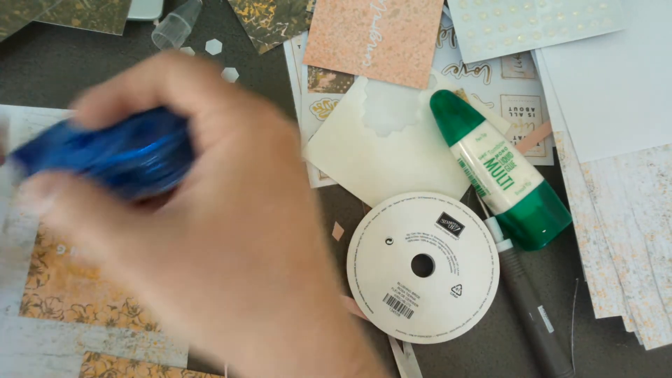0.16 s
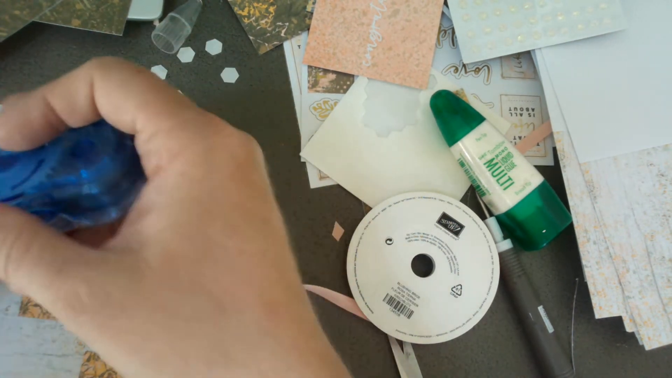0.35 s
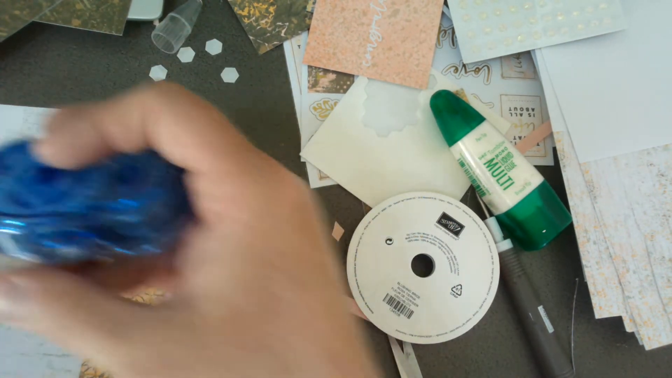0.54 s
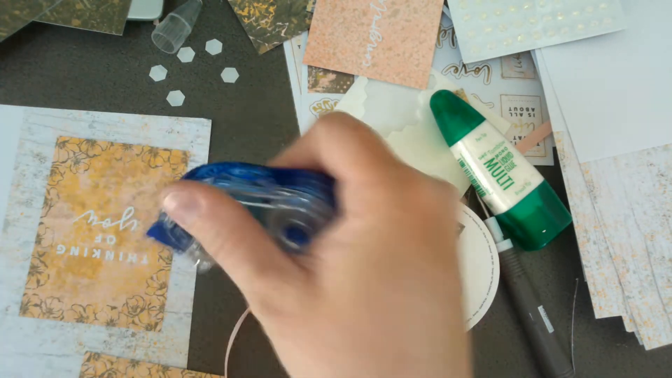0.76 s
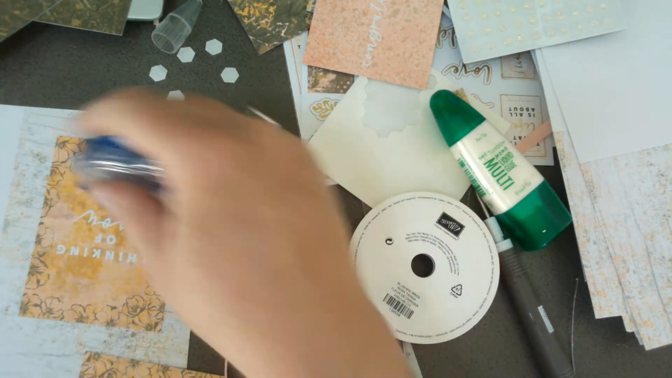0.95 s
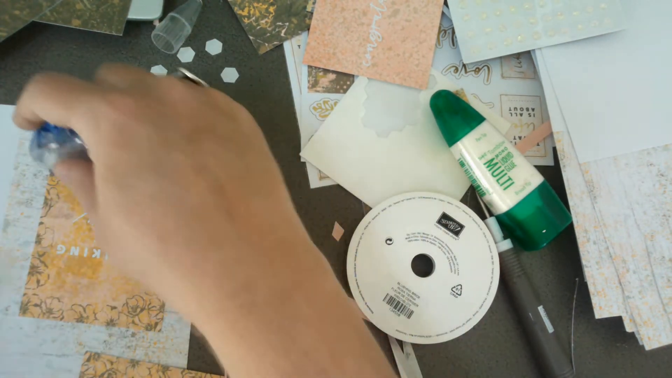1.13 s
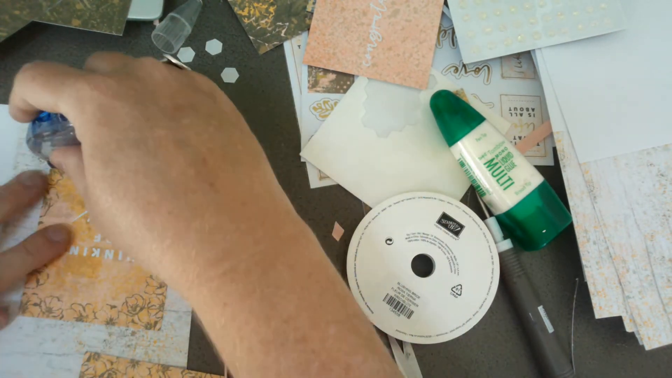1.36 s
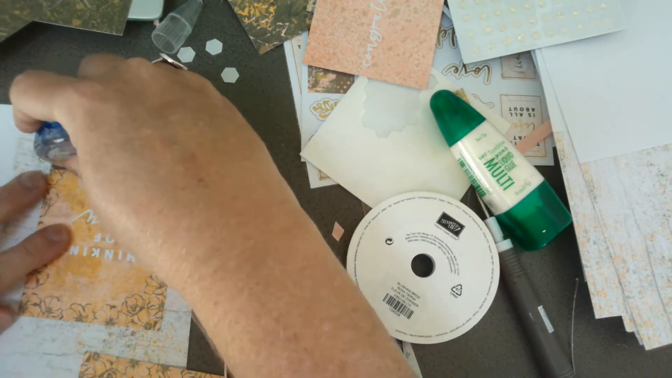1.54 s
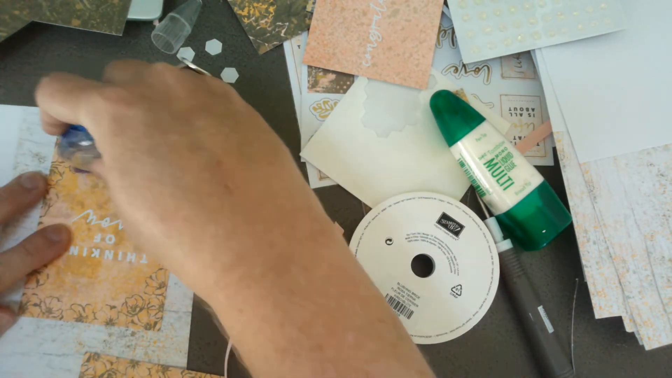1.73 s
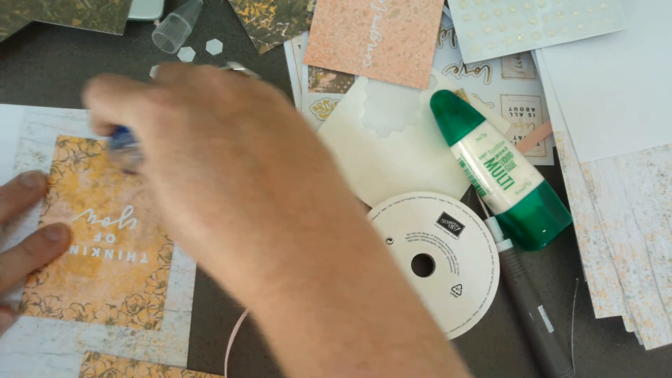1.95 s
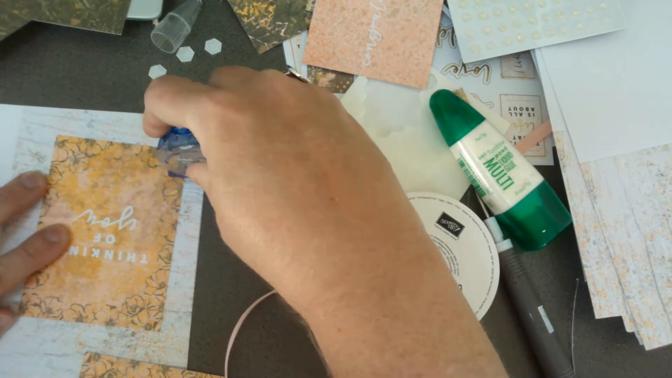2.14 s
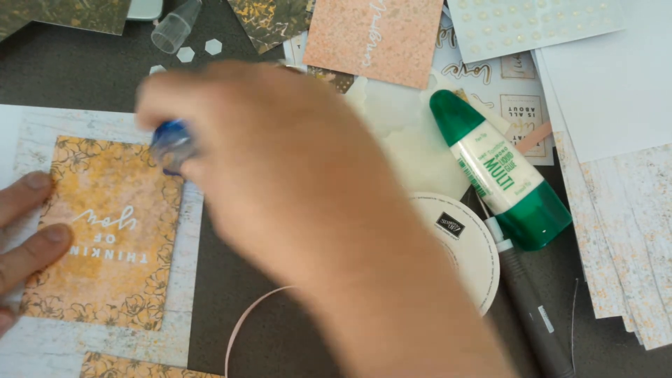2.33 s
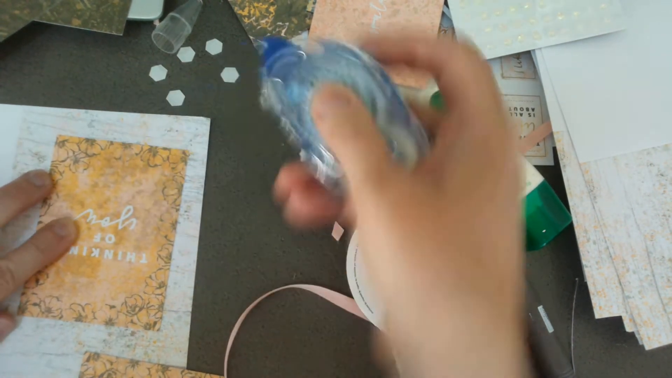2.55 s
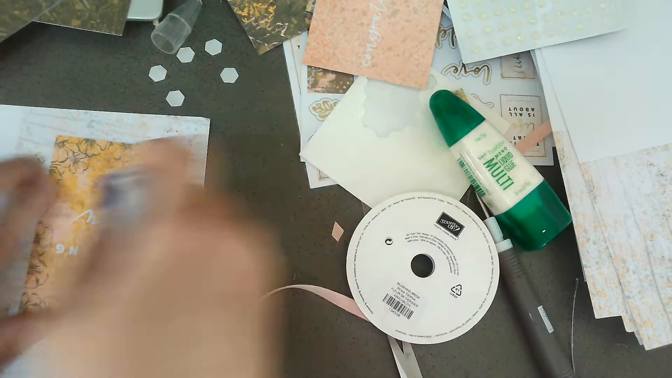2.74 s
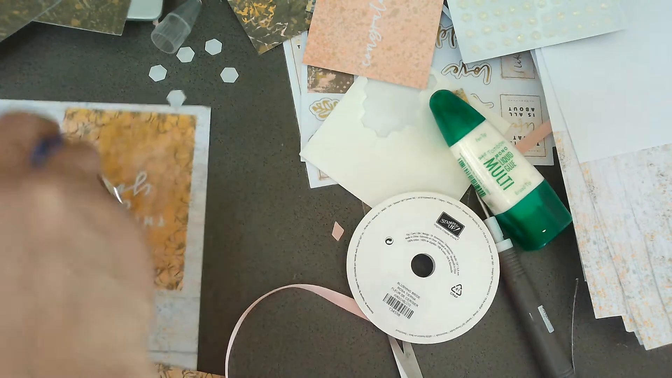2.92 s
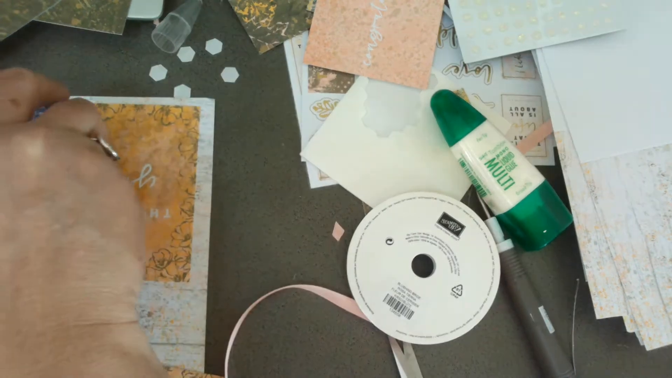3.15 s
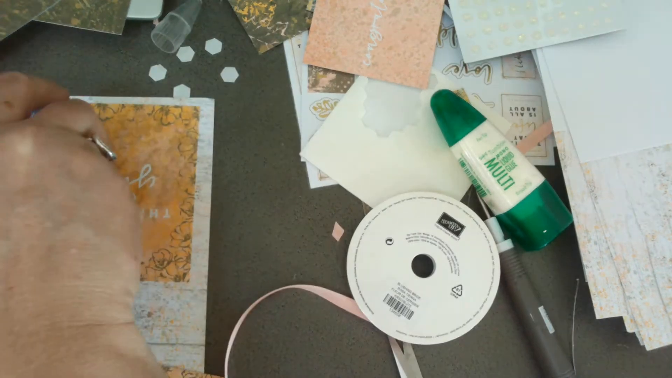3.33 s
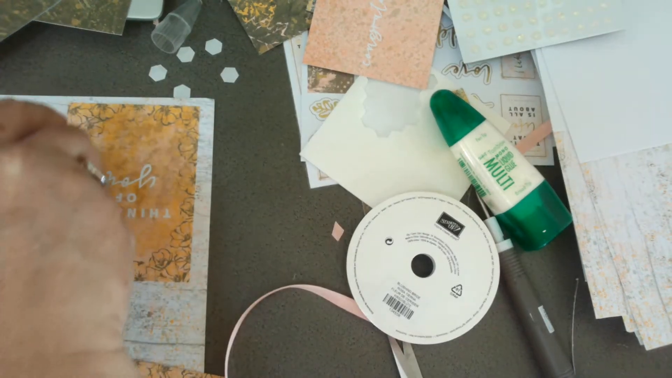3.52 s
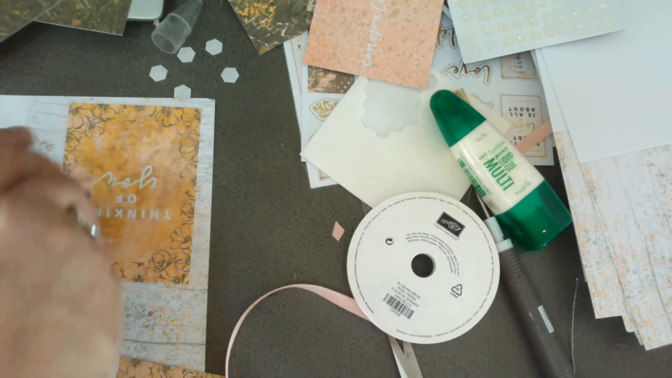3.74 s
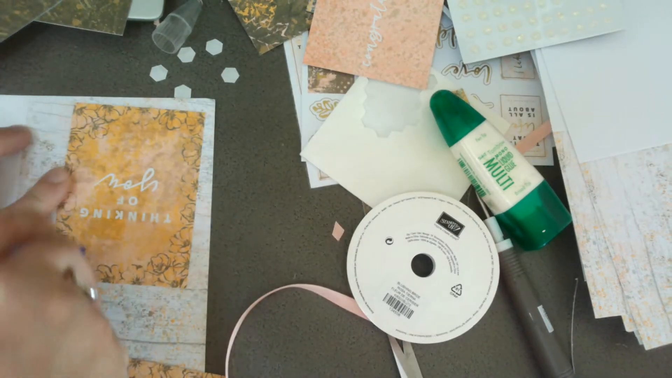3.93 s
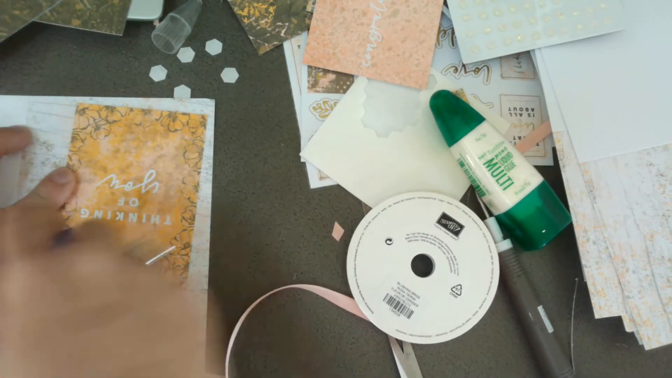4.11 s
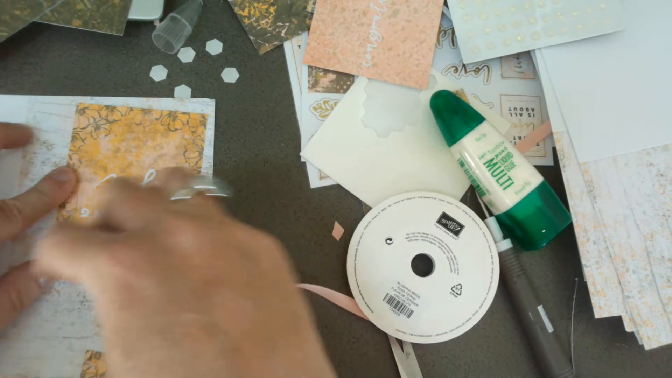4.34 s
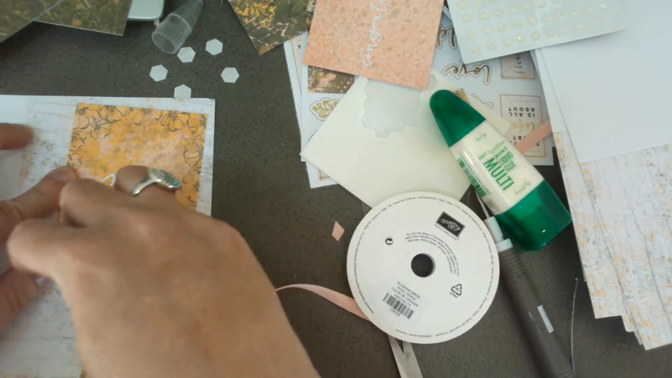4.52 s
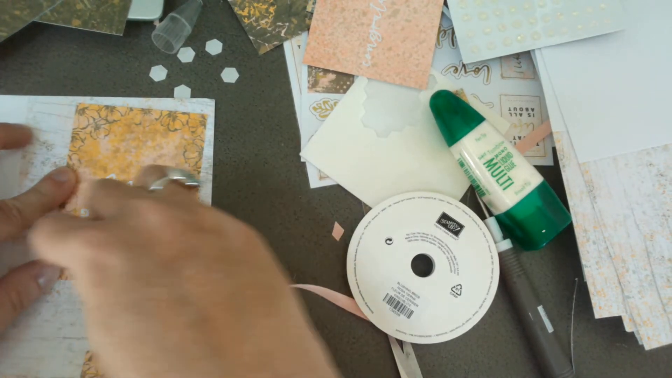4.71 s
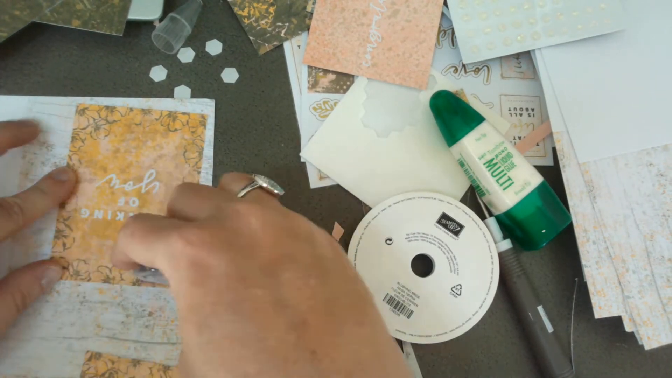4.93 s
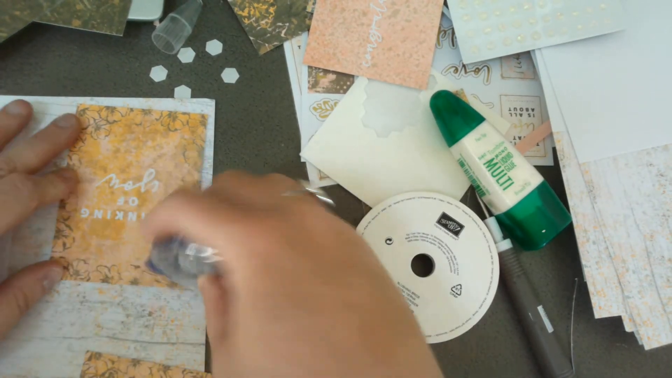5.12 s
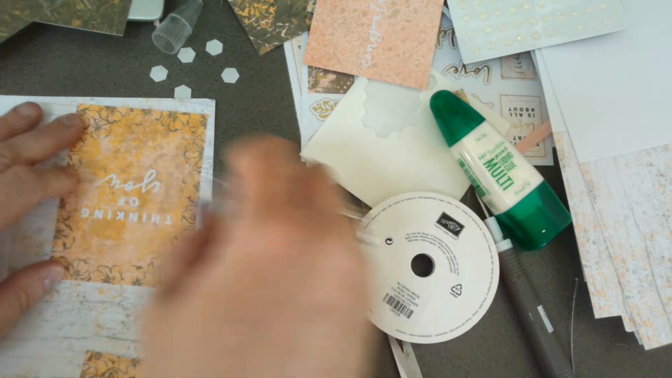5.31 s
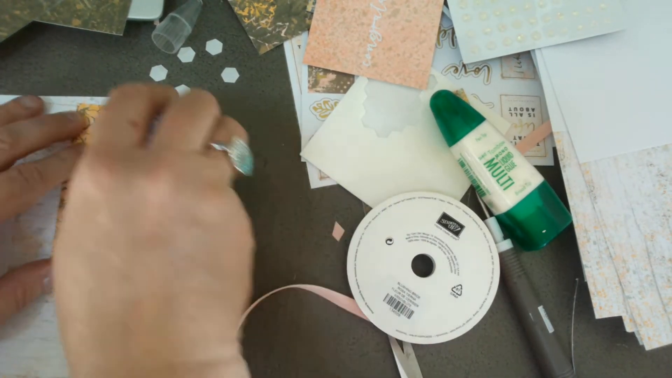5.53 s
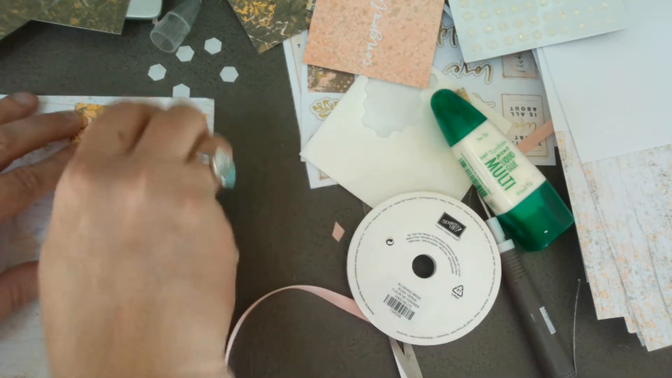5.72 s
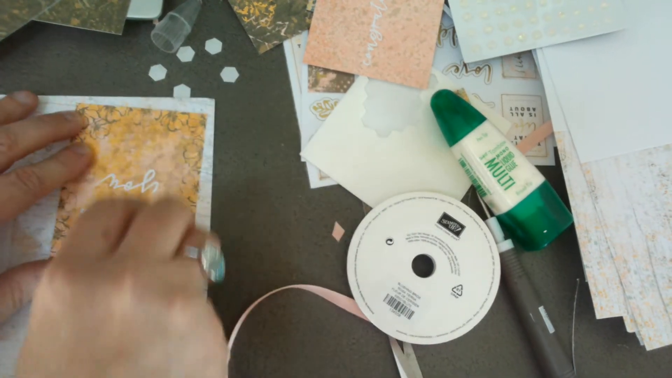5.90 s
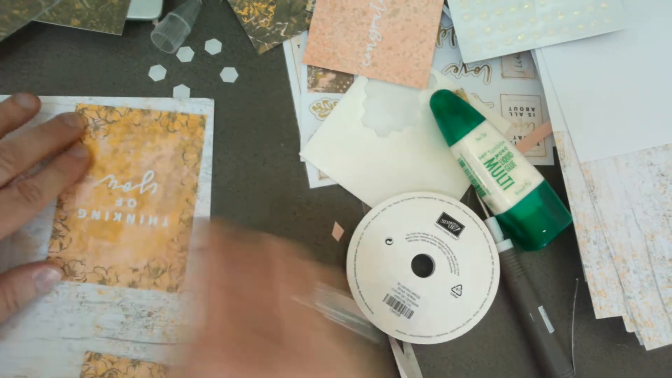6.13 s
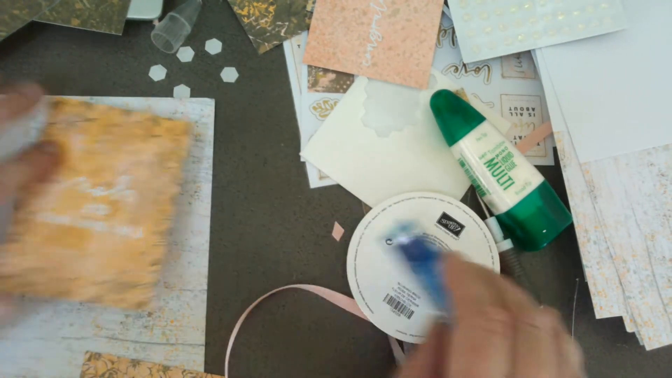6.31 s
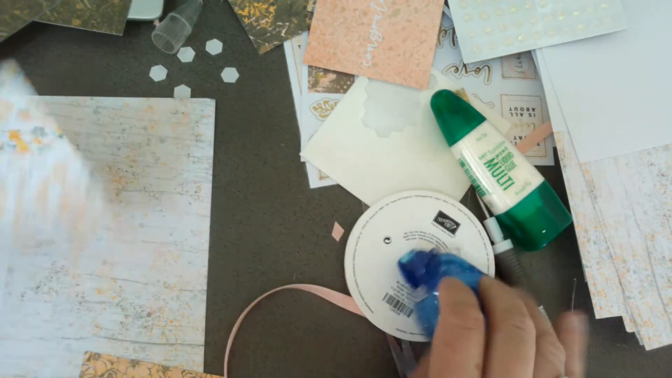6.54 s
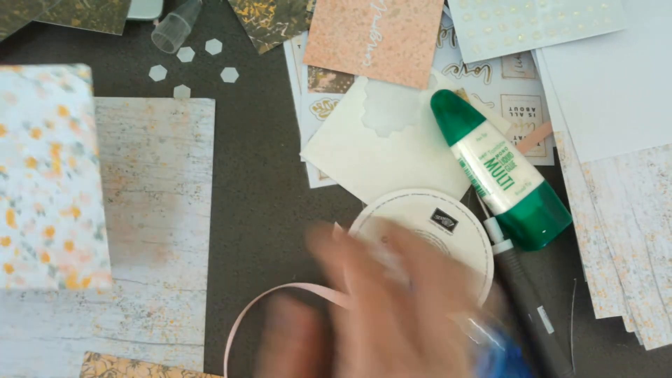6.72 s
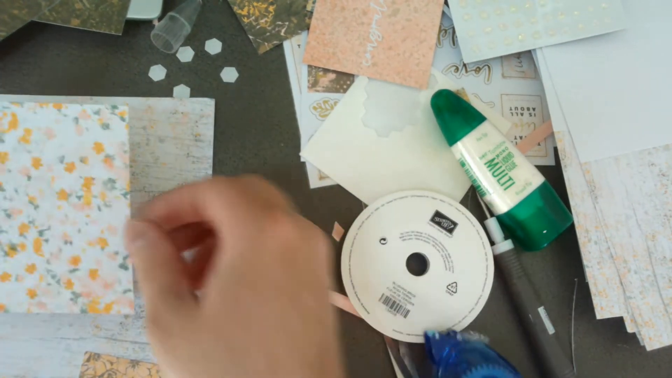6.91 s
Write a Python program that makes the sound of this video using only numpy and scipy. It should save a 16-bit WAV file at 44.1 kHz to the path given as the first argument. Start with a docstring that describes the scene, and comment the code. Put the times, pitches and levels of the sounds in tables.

```python
"""Tape runner on cardstock

A plastic tape runner is drawn along four card edges: a ratchet snaps per tooth as shaped noise,
at an uneven pace, over the hiss of unrolling tape. Filtered noise hits click the case and bump the table.
At the end it is dropped beside a hollow spool, which rings as decaying sines, while card slides about.
A small, quiet room answers with a noise tail, under rumble, faint hiss and a weak hum."""
import sys
import numpy as np
from scipy import signal
from scipy.fft import rfft, irfft, next_fast_len
from scipy.io import wavfile
from scipy.ndimage import uniform_filter1d

SR = 44100
rng = np.random.default_rng(int(sys.argv[2]) if len(sys.argv) > 2 else 0)


def wav_out(sig):
    """Save sig, one row per channel (or a flat mono array), as 16-bit PCM at SR to the path in sys.argv[1]."""
    wavfile.write(sys.argv[1], SR, np.round(np.clip(np.atleast_2d(sig).T, -1, 1) * 32767).astype(np.int16))


N = 307155
HIT_S = np.arange(SR // 8) / SR  # time axis of one hit


def amp(db):
    """Decibels to gain."""
    return 10 ** (np.asarray(db) / 20)


def unit(x):
    """Scales to rms 1."""
    return x / np.sqrt(np.mean(x ** 2) + 1e-20)


def along(points, hz):
    """Reads (Hz, value) points on a log frequency axis."""
    f, v = np.transpose(points)
    return np.interp(np.log(hz + 1), np.log(f), v)


def add(track, start_s, sound):
    """Mixes a sound into the track in place, cut at the track's end."""
    part = track[max(round(start_s * SR), 0):][:len(sound)]
    part += sound[:len(part)]


def coloured(x, db_of_hz):
    """Filters x by a dB curve, minimum-phase so that nothing sounds before the hit."""
    m = 2 * next_fast_len(len(x))
    log_gain = np.log(amp(db_of_hz(np.fft.rfftfreq(m, 1 / SR))) + 1e-6)
    # folding the cepstrum makes the filter causal
    cepstrum = irfft(log_gain)
    cepstrum[1:m // 2] *= 2
    cepstrum[m // 2 + 1:] = 0
    return irfft(rfft(x, m) * np.exp(rfft(cepstrum)))[:len(x)]


def dying(noise, t60s, hold_s=0):
    """Noise that holds for a moment, then decays at its own rate in each band."""
    t = np.maximum(np.arange(len(noise)) / SR - hold_s, 0)
    hz = np.fft.rfftfreq(len(noise), 1 / SR)
    centres_hz, times_s = np.transpose(t60s)
    shares = np.array([along(np.c_[centres_hz, row], hz) for row in np.eye(len(centres_hz))])
    bands = irfft(rfft(noise) * shares, len(noise))
    return np.sum(bands * amp(-60 * t / times_s[:, None]), axis=0)


def strike(x, db):
    """Scales a hit so that its energy, packed into one millisecond, has this level."""
    return amp(db) * x / np.sqrt(np.sum(x ** 2) * 1000 / SR)


USUAL_TEETH_PER_S = 57


def teeth(travel):
    """One snap per tooth passed: time in s, level in dB, speed in octaves above the usual one."""
    s, passed, db = np.transpose(travel)
    tooth = np.arange(round(passed[-1]) + 1)
    times_s = np.interp(tooth, passed, s)
    speed_octaves = -np.log2(np.abs(np.gradient(times_s)) * USUAL_TEETH_PER_S + 1e-6)
    return times_s, np.interp(times_s, s, db), speed_octaves


def grip_db(grip, progress, hz):
    """Flat-topped resonances and dips of the grip, gliding as progress goes from 0 to 1."""
    total_db = 0
    for start_hz, end_hz, width_hz, lift_db in grip:
        centre_hz = start_hz + progress * (end_hz - start_hz)
        total_db = total_db + lift_db / (1 + (2 * (hz - centre_hz) / width_hz) ** 4)
    return total_db


# Colour of the runner's mechanism. Each row: frequency in Hz, relative density in dB per Hz.
SNAP_COLOUR = [(200, -20.5), (400, -23), (750, -22), (950, -18), (1300, -6), (2000, -8.5), (3300, -1),
               (4500, -3.5), (5900, -3.5), (7500, -7.5), (9200, -16.5), (11500, -17), (13500, -10),
               (15300, 1.5), (16200, -15)]
# Ring of the ratchet. Each row: frequency in Hz, t60 in seconds.
PAWL_T60 = [(1000, 0.025), (3000, 0.021), (6000, 0.021), (10000, 0.02), (15000, 0.021)]
SCATTER_DB, BRIGHT_SCATTER_DB = 0.73, 2.5  # from tooth to tooth


def stroke(travel, grip, gain_db, treble_db, crack_db, chatter_s, rebound_db, rebound_s):
    """The pawl snaps off each tooth, chatters against the same case, and lands again more dully."""
    out = np.zeros(N)
    shell = rng.standard_normal(len(HIT_S))  # shared by all snaps of the stroke
    times_s, levels_db, _ = teeth(travel)
    for progress, s, db in zip(np.linspace(0, 1, len(times_s)), times_s, levels_db):
        noise = unit(shell + rng.standard_normal(len(HIT_S)))
        ring = dying(noise, PAWL_T60, chatter_s * rng.uniform(0.21, 2.0))
        ring *= 1 + amp(crack_db) * np.exp(-HIT_S / 0.00087)

        landing = dying(rng.standard_normal(len(HIT_S)), PAWL_T60)
        landing = coloured(landing, lambda hz: along([(2500, -2.5), (9000, -12.5)], hz))
        add(ring, rebound_s * rng.uniform(0.64, 1.3), amp(rebound_db) * landing)

        # treble_db: start, middle and end of the stroke
        bright_db = np.interp(progress, [0, .5, 1], treble_db)
        bright_db += BRIGHT_SCATTER_DB * rng.standard_normal()

        def colour(hz):
            tilt_db = bright_db * along([(3000, 0.049), (6000, 0.95)], hz)
            return along(SNAP_COLOUR, hz) + grip_db(grip, progress, hz) + tilt_db

        snap_db = db + gain_db + SCATTER_DB * rng.standard_normal()
        add(out, s, strike(coloured(ring, colour), snap_db))
    return out


# Travel along each card edge, steady between points.
# Each row: time in seconds, teeth passed, level in dB before the stroke's gain and scatter.
TRAVEL_1 = [(1.6529, 0, -24.5), (1.6835, 1, -23), (1.739, 4, -24.5), (1.8122, 6, -22.5), (1.8396, 7, -23),
            (1.8577, 8, -23.5), (1.8844, 10, -21), (1.9325, 13, -21.5), (2.0215, 20, -23.5),
            (2.043, 21, -22.5)]
TRAVEL_2 = [(3.3536, 0, -23.5), (3.4346, 3, -23), (3.4668, 4, -24.5), (3.528, 6, -23.5), (3.5518, 7, -24.5),
            (3.6105, 10, -25.5), (3.6588, 12, -25), (3.7558, 17, -26), (3.8602, 24, -23.5),
            (3.902, 26, -23.5)]
TRAVEL_3 = [(4.6161, 0, -24), (4.64, 1, -22.5), (4.7115, 6, -20.5), (4.8075, 14, -23.5),
            (4.8286, 15, -24.5), (4.929, 16, -22.5), (4.9545, 17, -21), (4.9704, 18, -23),
            (4.9951, 19, -22.5)]
TRAVEL_4 = [(5.6386, 0, -22.5), (5.658, 1, -23.5), (5.725, 7, -24.5), (5.759, 11, -23), (5.7805, 14, -22.5),
            (5.8224, 19, -25.5), (5.8484, 21, -24), (5.8803, 23, -25.5), (5.9092, 24, -26.5)]
# Resonances and dips of each grip, shifting along the stroke; negative lift is a dip.
# Each row: start in Hz, end in Hz, width in Hz, lift in dB.
GRIP_1 = [(646, 780, 590, -2.5), (1400, 1550, 550, 1), (1950, 1720, 300, -7), (2980, 3820, 730, 4.5),
          (3630, 3950, 330, 1.5), (4860, 4600, 1400, -3)]
GRIP_2 = [(378, 450, 160, 5), (1410, 1630, 950, -4.5), (2400, 2500, 470, 3.5), (3360, 3700, 560, 0.5),
          (3920, 3260, 600, -4.5), (6400, 6300, 1700, 3.5)]
GRIP_3 = [(1150, 1100, 240, 2), (1630, 1860, 460, 8.5), (2850, 3100, 220, -8), (5300, 5570, 400, 10),
          (6500, 6200, 690, -2.5)]
GRIP_4 = [(1650, 1630, 240, 6.5), (2150, 2000, 160, 5.5), (3250, 2440, 770, 6.5), (4800, 5000, 460, -0.5),
          (6140, 5500, 950, 5)]


def ratchet():
    """Four strokes, the runner held differently for each."""
    first = stroke(TRAVEL_1, GRIP_1, gain_db=-1, treble_db=(2, 6, 1), crack_db=-6,
                   chatter_s=0.00085, rebound_db=-3.5, rebound_s=0.003)
    second = stroke(TRAVEL_2, GRIP_2, gain_db=-1, treble_db=(3, -2.5, 7), crack_db=-3,
                    chatter_s=0.00094, rebound_db=-1, rebound_s=0.0038)
    third = stroke(TRAVEL_3, GRIP_3, gain_db=-0.06, treble_db=(-3.5, 2, 3), crack_db=-11,
                   chatter_s=0.0011, rebound_db=-3.5, rebound_s=0.0024)
    fourth = stroke(TRAVEL_4, GRIP_4, gain_db=-0.3, treble_db=(0.5, 1, 1.5), crack_db=-13,
                    chatter_s=0.0016, rebound_db=-4.5, rebound_s=0.0018)
    return first + second + third + fourth


def band_db(x, low_hz, high_hz):
    """Energy of a sound inside a band."""
    hz = np.fft.rfftfreq(len(x), 1 / SR)
    inside = (hz > low_hz) & (hz < high_hz)
    return 10 * np.log10(np.sum(np.abs(rfft(x)[inside]) ** 2))


# Colour of the plastic case. Each row: frequency in Hz, relative density in dB per Hz.
CASE_COLOUR = [(200, -43), (700, -21), (1200, -4.5), (1650, 2), (2200, -6.5), (2700, -7), (3700, -2.5),
               (4500, -9.5), (5400, 0), (6500, -12), (9000, -21), (12000, -25), (15000, -7), (16500, -16)]
# Ring of the case. Each row: frequency in Hz, t60 in seconds.
CASE_T60 = [(1000, 0.041), (3000, 0.034), (6000, 0.022), (10000, 0.024), (15000, 0.0044)]


def click(db, ring_hz, knock_db, fizz_db):
    """A hard contact: a crack and a short plastic ring; blunt blows knock, sharp ones fizz."""
    crack_db, crack_s, rise_s = 8, 0.0011, 0.00063
    ring_db, width_hz = 8, 450
    ring = dying(rng.standard_normal(len(HIT_S)), CASE_T60)
    ring *= 1 + amp(crack_db) * np.exp(-HIT_S / crack_s)
    ring *= 1 - np.exp(-HIT_S / rise_s)

    def colour(hz):
        return along(CASE_COLOUR, hz) + ring_db / (1 + (2 * (hz - ring_hz) / width_hz) ** 2)

    ring = coloured(ring, colour)
    # knock and fizz: low and high bands steered relative to the middle one
    low = band_db(ring, 900, 2200)
    middle = band_db(ring, 2200, 6500)
    high = band_db(ring, 6500, 16000)
    balance = [(1900, knock_db + middle - low), (2500, 0), (5900, 0), (7000, fizz_db + middle - high)]
    return strike(coloured(ring, lambda hz: along(balance, hz)), db)


# Distinct clicks and blows on the plastic case.
# Each row: time in seconds, level in dB, strongest ring in Hz, knock in dB, fizz in dB.
CLICKS = [(0.268, -22.5, 4950, -15, -2.5), (0.284, -35.5, 1720, 3, -15), (0.2979, -35.5, 1550, -5, -22),
          (0.423, -44.5, 3550, -12, -9.5), (0.544, -43.5, 3050, -9, -11), (0.636, -38.5, 1740, 7, -28),
          (0.6519, -32.5, 1830, -1, -20), (0.66, -31.5, 3740, -27, -15), (0.6902, -30, 1790, -3.5, -14),
          (0.7079, -29, 5700, -26, -13.5), (0.778, -49, 1800, 10, 4), (1.283, -43, 5160, -16, -12),
          (1.3331, -47.5, 1280, -1, -14), (1.4462, -41, 1330, 3.5, -10), (1.576, -37.5, 1310, 0.5, -14),
          (2.208, -41.5, 3900, -4, 4), (2.3, -25.5, 4000, -25, -9), (2.356, -47, 2080, 1, -23),
          (2.619, -52, 2740, -10, -10), (3.089, -38.5, 4470, -5.5, -17), (3.2984, -40, 1330, -1, -20),
          (4.4368, -38.5, 2720, -4.5, -9), (4.459, -41, 1280, 7, -22), (4.8487, -33.5, 3470, -11, -17),
          (5.0851, -34.5, 3740, -11, -8.5), (5.345, -50.5, 2540, -10, -11), (5.56, -31, 2950, -4.5, -12.5),
          (6.3779, -19, 5350, -7, -7), (6.38, -18, 4350, -8, -6.5), (6.387, -34, 5170, -16, -16),
          (6.409, -32.5, 5340, -9, -22), (6.5074, -40, 4970, -8, -22), (6.6136, -9, 5150, -21.5, -17.5),
          (6.6414, -44, 5200, 6, -19), (6.66, -11, 3470, -17.5, -14.5), (6.6914, -18, 2680, -13, -20),
          (6.7188, -32.5, 3770, -6, -24), (6.7777, -26.5, 5460, -8, -21), (6.7966, -25.5, 2900, -11, -21),
          (6.8322, -36.5, 3380, -11, -7), (6.9391, -35.5, 3600, -10, -16)]


def case_clicks():
    """The case is gripped, set on the card, lifted and finally dropped."""
    out = np.zeros(N)
    for s, db, ring_hz, knock_db, fizz_db in CLICKS:
        add(out, s, click(db, ring_hz, knock_db, fizz_db))
    return out


# The hollow spool's modes. Each row: frequency in Hz, mean level in dB, t60 in seconds before damping.
SPOOL_MODES = [(555, -4.5, 0.08), (710, -5.5, 0.11), (766, -6, 0.14), (1185, -2.5, 0.029),
               (1503, -4, 0.064), (1640, -12, 0.041), (2050, -8, .04)]
# The runner rocks against the spool. Each row: time in seconds, level in dB.
ROCKS = [(6.63, -29.5), (6.663, -44), (6.71, -28.5), (6.78, -36), (6.867, -33.5), (6.93, -43.5)]


def spool():
    """The hollow spool's sine modes ring at new strengths with each nudge."""
    mode_scatter_db, damping_s, rise_s = 3, 0.032, 0.00031
    out = np.zeros(N)
    for s, db in ROCKS:
        ring = np.zeros(len(HIT_S))
        for hz, level_db, t60_s in SPOOL_MODES:
            decay = amp(level_db + rng.normal(0, mode_scatter_db) - 60 * HIT_S / t60_s)
            ring += decay * np.sin(2 * np.pi * hz * HIT_S + rng.uniform(0, 2 * np.pi))
        ring *= np.exp(-HIT_S / damping_s) * (1 - np.exp(-HIT_S / rise_s))
        add(out, s, strike(ring, db))
    return out


# Colour of the table's thud. Each row: frequency in Hz, relative density in dB per Hz.
TABLE_COLOUR = [(60, -9), (110, -7), (170, -3.5), (240, 0.5), (350, -4), (500, -15), (900, -16.5),
                (2500, -40)]
# Soft bumps on the table. Each row: time in seconds, level of the first push in dB.
BUMPS = [(1.245, -50.5), (1.444, -48), (3.082, -44), (3.53, -50), (4.433, -40), (5.557, -37.5),
         (6.382, -43), (6.415, -40.5), (6.613, -34), (6.662, -39), (6.80, -43.5)]


def bumps():
    """The padded table takes a soft push, then a weaker one as the hand settles: dull thuds."""
    life_s, push_db, push_s = 0.011, 14, 0.0001
    settle_s, settle_db = 0.014, -5
    out = np.zeros(N)
    for s, db in BUMPS:
        for delay_s, drop_db in [(0, 0), (settle_s, settle_db)]:
            force = rng.standard_normal(len(HIT_S)) * np.exp(-HIT_S / life_s)
            force += amp(push_db) * np.exp(-HIT_S / push_s)
            thud = coloured(force, lambda hz: along(TABLE_COLOUR, hz))
            add(out, s + delay_s, strike(thud, db + drop_db))
    return out


def squeak():
    """The plastic sticks and slips for an instant as the grip shifts: a wavering tone and its octave."""
    start_s, length_s, db = 0.661, 0.014, -38
    pitch_hz, overtone_db, waver = 3900, -12, 0.035
    t = np.arange(int(length_s * SR)) / SR
    drift = unit(uniform_filter1d(rng.standard_normal(len(HIT_S)), size=30))[:len(t)]
    phase = 2 * np.pi * np.cumsum(pitch_hz * (1 + waver * drift)) / SR
    tone = unit(np.sin(phase) + amp(overtone_db) * np.sin(2 * phase))
    out = np.zeros(N)
    add(out, start_s, amp(db) * tone * np.sin(np.pi * t / length_s) ** 0.5)
    return out


def hump(hz, centre_hz, steep_db):
    """A dB curve that falls on both sides of a centre, with the square of octaves."""
    return -steep_db * np.log2((hz + 1) / centre_hz) ** 2


def rub(t, centre_hz):
    """Fibres catch and let go, as noise of uneven level; the case lends them its colour."""
    grain_db, catches_per_s, case_share = 5, 260, 0.3
    catches = np.interp(t * catches_per_s, np.arange(256), rng.standard_normal(size=256))
    grains = rng.standard_normal(SR)[:len(t)] * amp(grain_db * catches)

    def colour(hz):
        body_db = (1 - case_share) * along(SNAP_COLOUR, hz) + case_share * along(CASE_COLOUR, hz)
        return body_db + hump(hz, centre_hz, steep_db=2.0)

    return unit(coloured(grains, colour))


TAPE_DB_PER_SPEED_OCTAVE = 11


def tape(travel, db, centre_hz):
    """The tape bites and unrolls onto the card, louder the faster the runner moves."""
    bite_s, lift_s, lead_s = 0.047, 0.042, 0.012
    out = np.zeros(N)
    times_s, _, speed_octaves = teeth(travel)
    start_s = times_s[0] - lead_s
    t = np.arange(int((times_s[-1] + lift_s - start_s) * SR)) / SR
    contact = np.clip(np.minimum(t / bite_s, (t[-1] - t) / lift_s), 0, 1)
    level_db = db + TAPE_DB_PER_SPEED_OCTAVE * np.interp(start_s + t, times_s, speed_octaves)
    add(out, start_s, amp(level_db) * contact * rub(t, centre_hz))
    return out


def unrolling():
    """The tape along each of the four edges."""
    return (tape(TRAVEL_1, db=-54.5, centre_hz=3500) + tape(TRAVEL_2, db=-52, centre_hz=1700)
            + tape(TRAVEL_3, db=-51, centre_hz=1600) + tape(TRAVEL_4, db=-58, centre_hz=2720))


# Card and skin sliding.
# Each row: start in seconds, length in seconds, level in dB before the swell, centre in Hz.
SLIDES = [(0.618, 0.095, -52.5, 2520), (0.724, 0.13, -66, 7050), (1.269, 0.064, -63, 5560),
          (2.025, 0.11, -56, 2200), (2.508, 0.092, -61.5, 3000), (2.51, 0.39, -59, 15100),
          (2.698, 0.17, -59.5, 7500), (2.948, 0.3, -66, 5540), (3.908, 0.2, -61, 2600),
          (4.429, 0.019, -51.5, 13000), (4.6, 0.066, -55, 1600), (6.059, 0.12, -67.5, 5000),
          (6.474, 0.14, -60.5, 3480), (6.684, 0.26, -55, 2060)]


def slides():
    """Each slide of card or skin is a rub that swells and fades."""
    out = np.zeros(N)
    for s, length_s, db, centre_hz in SLIDES:
        t = np.arange(int(length_s * SR)) / SR
        swell = np.sin(np.pi * t / (t[-1] + 1 / SR)) ** 0.54
        add(out, s, amp(db) * rub(t, centre_hz) * swell)
    return out


# Spells in which the loose case ticks faintly.
# Each row: start in seconds, length in seconds, mean level in dB, middle ring in Hz, knock in dB.
RATTLES = [(0.031, 0.04, -53.5, 3700, -13), (1.249, 0.26, -56.5, 1290, -1), (2.334, 0.13, -55, 1900, 4),
           (3.227, 0.07, -53.5, 2970, 0), (3.987, 0.08, -45.5, 2600, -5), (6.636, 0.32, -41, 5300, -6)]
TICKS_PER_S, TICK_SCATTER_DB, TICK_FIZZ_DB, TICK_SPREAD_OCTAVES = 39, 4.5, -13.5, 0.18


def rattles():
    """Loose parts tick at uneven moments, each tick with its own strength and ring."""
    out = np.zeros(N)
    for start_s, length_s, db, ring_hz, knock_db in RATTLES:
        for s in np.arange(start_s, start_s + length_s, 1 / TICKS_PER_S):
            strength, pitch = rng.standard_normal(2)
            tick_db = db + TICK_SCATTER_DB * strength
            tick_hz = ring_hz * 2 ** (TICK_SPREAD_OCTAVES * pitch)
            tick = click(tick_db, tick_hz, knock_db, TICK_FIZZ_DB)
            add(out, s + rng.uniform(-0.36, 0.5) / TICKS_PER_S, tick)
    return out


# Decay of the room. Each row: frequency in Hz, t60 in seconds.
ROOM_T60 = [(200, 0.36), (1500, 0.6), (5000, 0.56), (9000, 0.35), (15000, 0.25)]
# Colour of the reflections. Each row: frequency in Hz, gain in dB on top of the send level.
WALL_COLOUR = [(200, 10.5), (1500, -3.5), (5500, -7.5), (9000, -7), (15000, -5)]


def room(x):
    """The room's noise tail, drawn anew every 0.1 s so that no single ring persists."""
    delay_s, build_s = 0.0045, 0.0013
    out, step = np.zeros(N), SR // 10
    t = np.arange(SR * 3 // 4) / SR
    for i in range(0, N, step):
        tail = dying(rng.standard_normal(len(t)), ROOM_T60) * (1 - np.exp(-t / build_s))
        echo = signal.fftconvolve(x[i:i + step], tail / np.linalg.norm(tail))
        add(out, i / SR + delay_s, echo)
    return coloured(out, lambda hz: along(WALL_COLOUR, hz))


# Colour of the room's air. Each row: frequency in Hz, relative density in dB per Hz.
AIR_COLOUR = [(12, 0.5), (24, -7.5), (45, -6), (80, -23.5), (140, -21), (200, -26), (250, -23.5),
              (400, -31.5), (1000, -37.5), (1400, -38.5), (2500, -40), (5300, -41.5), (7000, -45),
              (16000, -45)]
AIR_DB = -56
# Narrow bands in the room's air. Each row: centre in Hz, width in Hz, rms level in dB.
HUM_BANDS = [(58.2, 5.1, -65), (120.8, 5.8, -76), (4150, 27, -84.5)]


def room_air():
    """Low rumble and faint hiss from coloured noise, a weak hum from narrow noise bands."""
    noise = rng.standard_normal(N)
    air = amp(AIR_DB) * unit(coloured(noise, lambda hz: along(AIR_COLOUR, hz)))
    hz = np.fft.rfftfreq(N, 1 / SR)
    for centre_hz, width_hz, db in HUM_BANDS:
        band = np.exp(-2 * ((hz - centre_hz) / width_hz) ** 2)
        air += amp(db) * unit(irfft(rfft(rng.standard_normal(N)) * band, N))
    return air


def scene():
    """Everything on the table, heard from just above it."""
    strokes = ratchet()
    handling = case_clicks() + spool() + bumps() + squeak() + unrolling() + slides() + rattles()
    reflected = room(amp(-9.5) * strokes + amp(-10.5) * handling)
    return (strokes + handling + reflected + room_air())[None]


TOP_HZ = 16200


def record(dry):
    """Cuts everything from the band limit upwards."""
    kept = np.fft.rfftfreq(N, 1 / SR) < TOP_HZ
    return irfft(rfft(dry) * kept, N)


dry = scene()
out = record(dry)
wav_out(out)
```